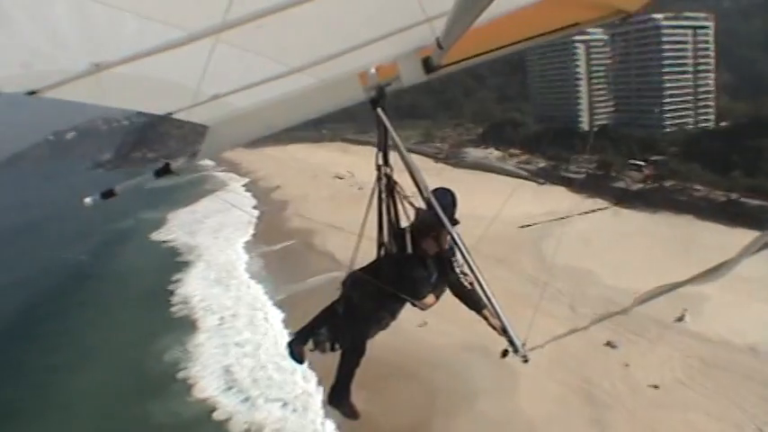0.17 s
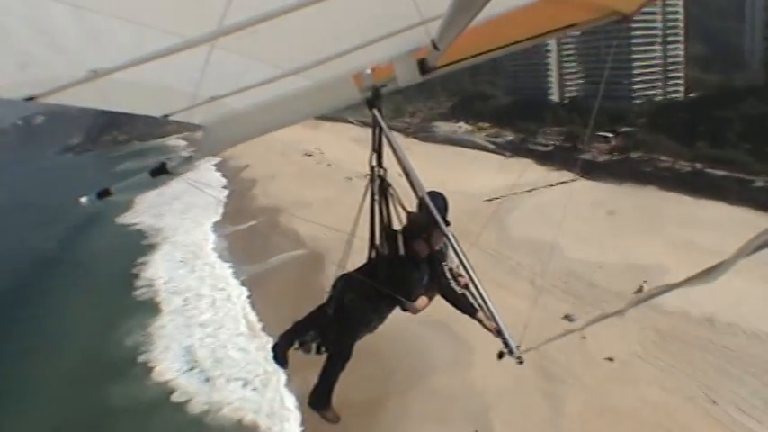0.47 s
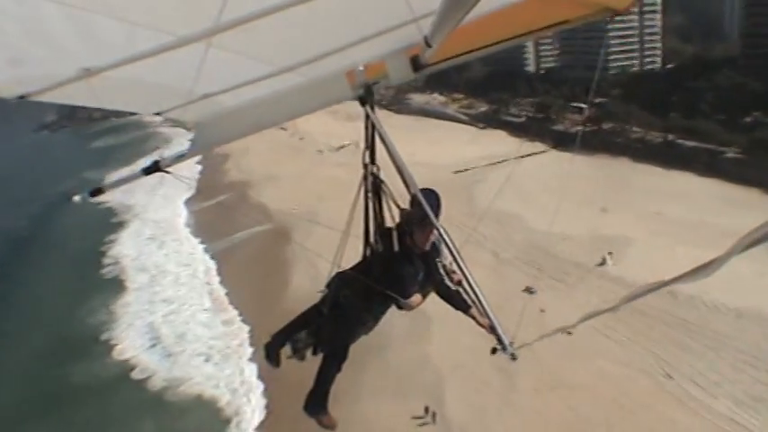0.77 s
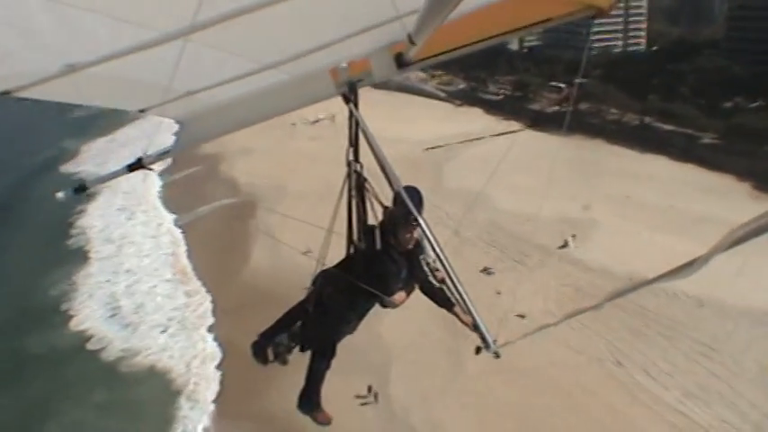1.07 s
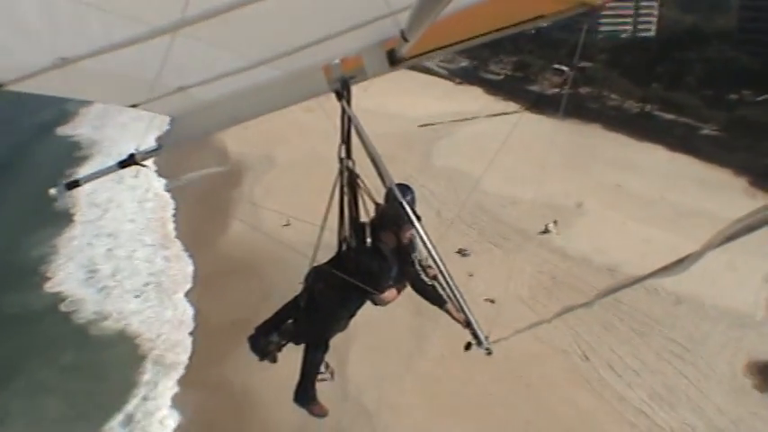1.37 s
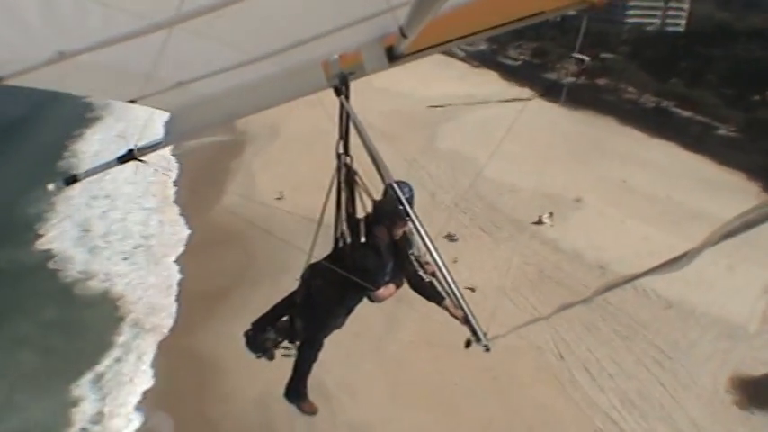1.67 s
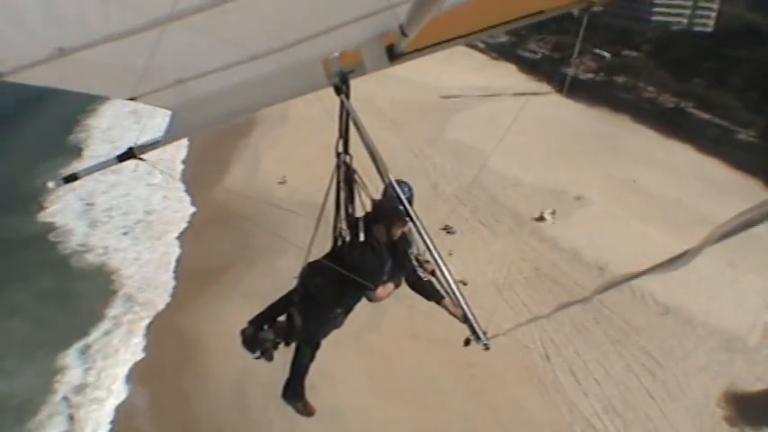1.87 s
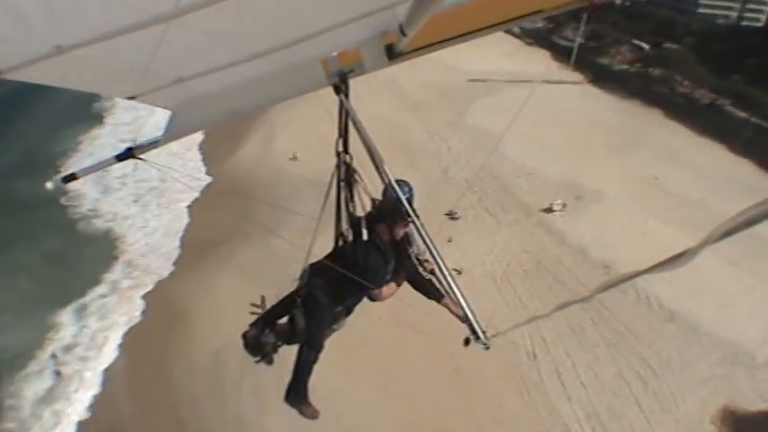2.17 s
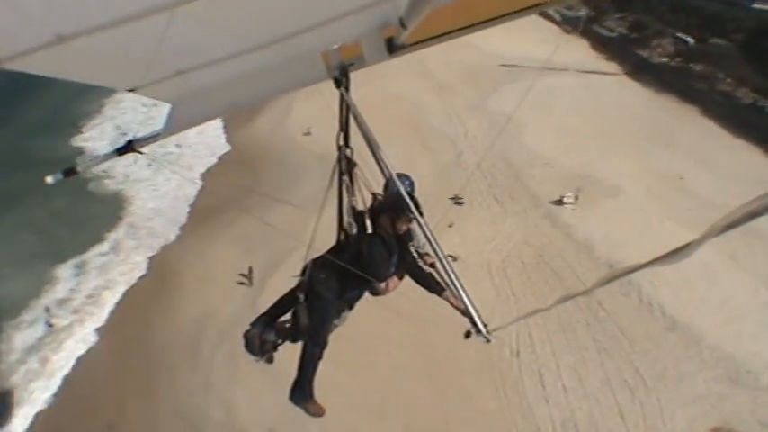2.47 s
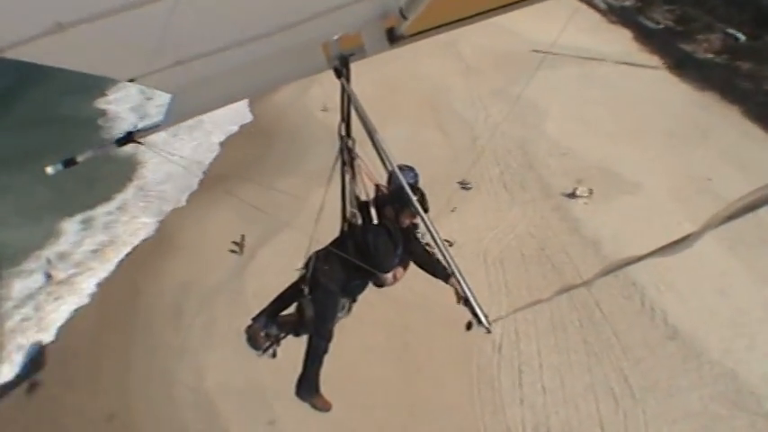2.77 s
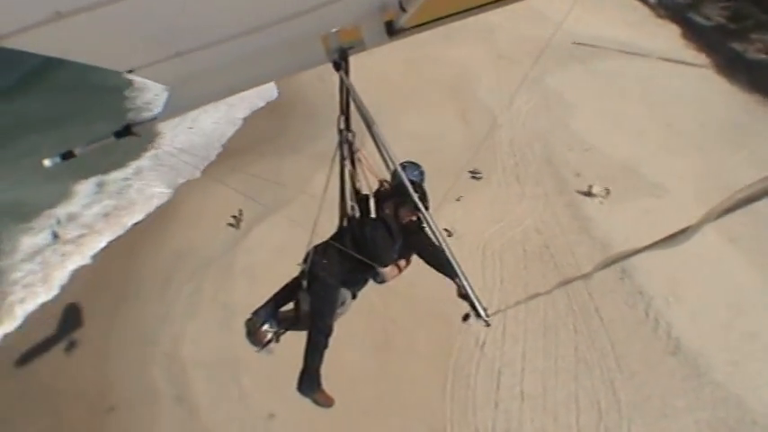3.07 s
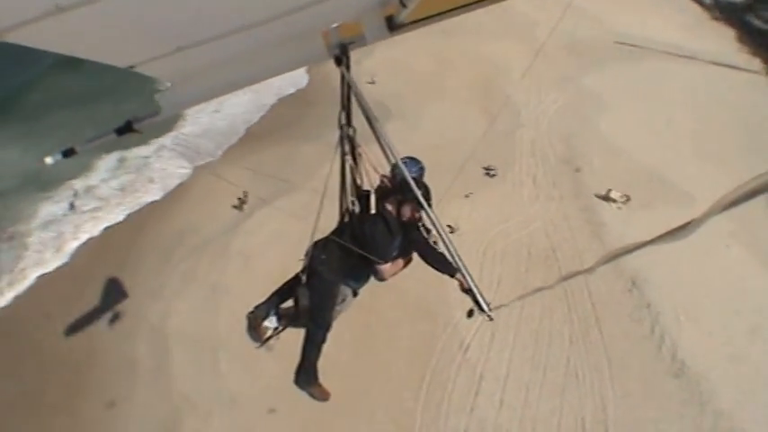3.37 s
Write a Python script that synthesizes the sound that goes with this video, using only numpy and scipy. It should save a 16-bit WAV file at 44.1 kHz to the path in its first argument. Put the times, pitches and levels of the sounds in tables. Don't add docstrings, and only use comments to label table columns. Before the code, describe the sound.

Wind rushes over an exposed, close stereo microphone on a hang glider, starting abruptly after about 0.04 seconds of silence. Deep rumble and ragged mid-range flutter continue throughout, with a faint wavering low moan. Dull slaps cluster around 0.6-1.0 and 1.6-2.0 seconds, with a strong gust near 1.94. Crisp snaps and hiss strengthen after 1.3, brightest around 3.3, continuing until 3.5. Outdoors, no echo.

```python
import sys
import numpy as np
from scipy import signal
from scipy.fft import rfft, irfft
from scipy.io import wavfile
from scipy.ndimage import uniform_filter1d, minimum_filter1d

SR = 44100
rng = np.random.default_rng(int(sys.argv[2]) if len(sys.argv) > 2 else 0)


def voltage_ratio(decibels):
    exponent = np.asarray(decibels, float) / 20
    return 10 ** exponent


def transcribe(u):
    v = np.clip(np.atleast_2d(u).T, -1, 1)
    q = np.round(v * 32767).astype(np.int16)
    wavfile.write(sys.argv[1], SR, q)


N = 155232
TIME = np.arange(N) / SR
CREST_DB = 2.5


def evened(x):
    return x / np.sqrt(np.mean(x ** 2) + 1e-20)


def curve(table, column=1):
    rows = np.array(table)
    return np.interp(TIME, rows[:, 0], rows[:, column])


def colour(x, spectrum):
    f, db = np.transpose(spectrum)
    hz = np.fft.rfftfreq(N, 1 / SR)
    gain = voltage_ratio(np.interp(np.log(hz + 1), np.log(f + 1), db))
    return evened(irfft(rfft(x) * gain, N))


def wander(top_hz):
    lowpass = signal.butter(2, top_hz, fs=SR, output="sos")
    return evened(signal.sosfiltfilt(lowpass, rng.standard_normal(N)))


def panned(db, pan_db):
    return voltage_ratio(db + np.array([[1], [-1]]) * pan_db * 0.5)


# time in seconds, level in dB.
SPEED = [(0.05, -44.5), (0.12, -42.5), (0.17, -50.5), (0.64, -48), (0.71, -51.5), (0.89, -51), (0.97, -45),
         (1.14, -44.5), (1.45, -43), (1.7, -40.5), (2.1, -40.5), (2.3, -38.5), (2.6, -36.5), (2.9, -35.5),
         (3.15, -35), (3.29, -33.5), (3.5, -35)]


def airspeed_db():
    speed = curve(SPEED)
    return speed - speed.mean()


# time in seconds, level in dB.
GUST = [(0.05, -22.5), (0.21, -22), (0.44, -21.5), (0.61, -21.5), (0.66, -18), (0.69, -22.5), (0.77, -17),
        (0.78, -25), (0.79, -21), (1.01, -18), (1.04, -19.5), (1.11, -18), (1.91, -17.5), (1.94, -8),
        (1.95, -21), (1.97, -17.5), (3.35, -19.5), (3.5, -21)]


def gusts_db():
    gust = curve(GUST)
    return gust - gust.mean()


def bursts():
    per_s, spread_db, rise_s, fall_s = 240, 4, 0.00066, 0.00077
    shared, slap_stir = 0.63, 7
    arrivals = rng.random((3, N)) < per_s / SR
    hits = arrivals * voltage_ratio(2 * spread_db * np.minimum(rng.exponential(1, (3, N)), 4))
    for s, db, _ in SLAPS:
        hits[2, round(s * SR)] += slap_stir * 10 * voltage_ratio(db)
    t = np.arange(1500) / SR
    shape = np.exp(-t / fall_s) - np.exp(-t / rise_s)
    power = signal.oaconvolve(hits, shape[None], axes=1)[:, :N]
    power = abs(shared * power[2] + (1 - shared) * power[:2])
    return power / power.mean()


# frequency in Hz, level in dB per Hz.
BUFFET = [(10, -41), (25, -17.5), (76, -6), (120, -1.5), (260, -1.5), (530, -9.5), (1000, -19.5),
          (2000, -38.5), (3300, -85)]


def buffet(flow, swell, burst):
    air = rng.standard_normal(N) * (2.3 + burst.mean(0)) ** 0.31
    return voltage_ratio(-14) * colour(air * voltage_ratio(1.31 * flow + 0.85 * swell), BUFFET)


# time in seconds, pitch in Hz, level in dB.
MOAN = [(0.06, 100, -26), (0.25, 122, -23), (0.5, 122, -23), (0.65, 130, -36), (0.92, 134, -24),
        (1.1, 132, -21), (1.25, 143, -19), (1.42, 146, -20), (1.56, 158, -30), (1.68, 170, -19),
        (1.98, 152, -18), (2.45, 152, -17.5), (2.62, 150, -21), (2.75, 140, -28), (2.94, 144, -18),
        (3.05, 150, -26), (3.5, 145, -28)]


def moan():
    width_hz, steady, wobble_hz = 18, 0.72, 9
    pitch = curve(MOAN) + wobble_hz * wander(15.8)
    turn = np.exp(2j * np.pi * np.cumsum(pitch) / SR)
    r = np.exp(-np.pi * width_hz / SR)
    fuzz = rng.standard_normal(N) / turn
    for _ in range(2):
        fuzz = signal.lfilter([1 - r], [1, -r], fuzz)
    mix = steady * evened(turn.real) + (1 - steady) * evened((turn * fuzz).real)
    return voltage_ratio(curve(MOAN, 2)) * evened(mix)


def kicked(air):
    kicks_per_s, share = 700, 0.4
    kicks = (rng.random(air.shape) < kicks_per_s / SR) * rng.laplace(size=air.shape)
    return np.sqrt(1 - share) * air + np.sqrt(share) * evened(kicks)


# frequency in Hz, level in dB per Hz.
EDDY = [(50, -38), (160, -8.5), (430, 1.5), (900, 0), (1500, -5.5), (2100, -16.5), (3200, -34),
        (16000, -86)]


def eddies(flow, speed, swell, burst, fitful):
    air = kicked(rng.standard_normal((2, N))) * (0.31 + burst) ** (0.5 * fitful)
    return voltage_ratio(-21) * colour(air * voltage_ratio(0.5 * flow + 0.55 * speed + 1.2 * swell), EDDY)


# frequency in Hz, level in dB per Hz.
FIZZ = [(1100, -20), (1800, -0.5), (2630, -2), (4950, -10), (7000, -23), (9500, -42), (13000, -50),
        (15700, -61)]


def fizz(flow, speed, swell, burst, fitful, crest):
    air = colour(rng.standard_normal((2, N)), FIZZ) * (0.47 + burst) ** (0.41 * fitful)
    return voltage_ratio(-33) * evened(air * voltage_ratio(0.58 * flow + 0.42 * speed + CREST_DB * crest + 0.37 * swell))


# frequency in Hz, level in dB per Hz.
HISS = [(2500, 0), (5000, -9), (7000, 2.5), (9300, 0.5), (11000, -6.5), (13000, -17), (16000, -36)]


def hiss(flow, speed, burst):
    air = colour(rng.standard_normal(N), HISS) * (0.5 + burst.mean(0)) ** 0.19
    return air * voltage_ratio(-51.5 + 0.18 * speed + 0.1 * flow)


# frequency in Hz, level in dB per Hz.
JET = [(2500, -16), (4000, 1.5), (5500, 3), (7500, -4), (9500, -10.5), (12000, -18.5), (15700, -30)]


def jet(speed, burst, crest):
    air = colour(rng.standard_normal((2, N)), JET) * (0.23 + burst) ** 0.25
    return air * voltage_ratio(-50.5 + 1.5 * speed + 2.24 * CREST_DB * crest)


# frequency in Hz, level in dB per Hz.
SHEEN = [(6000, -22), (10000, -11), (12000, 0), (16000, -12)]


def sheen(speed, crest):
    air = colour(rng.standard_normal((2, N)), SHEEN)
    return air * voltage_ratio(-66.5 + 0.3 * speed + 0.5 * CREST_DB * crest)


# time in seconds, peak in dB, left over right in dB.
SLAPS = [(0.068, -13, 2.5), (0.223, -12, -2.0), (0.313, -12, 1.0), (0.351, -14, -1.0), (0.506, -12, -1.0),
         (0.604, -12, -2.0), (0.649, -9, 0.5), (0.702, -11, 1.0), (0.733, -14, -3.0), (0.753, -7, 0.0),
         (0.764, -8, -1.0), (0.79, -13, 0.5), (0.823, -15, -1.5), (0.874, -11, -1.5), (0.88, -21, -2.0),
         (0.912, -13, 0.0), (0.943, -10, -3.0), (0.969, -10, 1.0), (1.052, -13, -1.0), (1.086, -12, 0.0),
         (1.311, -9, 1.5), (1.386, -7, 1.0), (1.63, -9, -1.0), (1.643, -6, 1.0), (1.764, -4, 2.5),
         (1.802, -7, 0.0), (1.871, -7, 2.0), (1.939, -7, 2.0), (1.97, -11, 1.0), (2.066, -10, -0.5),
         (2.275, -10, -1.0), (2.414, -9, -0.5), (2.572, -9, -1.0), (2.679, -7, -1.0), (3.014, -12, 0.5)]


def slaps():
    slap_s, trim_db = 0.0003, 2.5
    out = np.zeros((2, N))
    for s, db, pan_db in SLAPS:
        u = np.clip((TIME - s - 0.0012) / slap_s, 0, 40)
        out += panned(db + trim_db, pan_db) * u ** 3 * (1 - u / 4) * np.exp(-u) * 1.97
    return out


# time in seconds, peak in dB, left over right in dB.
SNAPS = [(0.1197, -32, 5.0), (0.3128, -39, 0), (0.4689, -38, -1.5), (0.7827, -36, 1.5), (0.8416, -30, -1.5),
         (0.875, -33, -1.5), (0.9922, -34, -4), (1.0281, -32, -6), (1.09, -37, 4), (1.1284, -29, -7),
         (1.1638, -31, 0.0), (1.1838, -35, 2.5), (1.2037, -32, -0.5), (1.2571, -32, 0.5), (1.2865, -33, -1),
         (1.307, -33, -1), (1.3404, -29, 0), (1.418, -25, 1.0), (1.4766, -32, 0.0), (1.538, -26, 6.0),
         (1.5644, -26, 1.5), (1.657, -22, -1), (1.7046, -35, -3), (1.7315, -33, -3), (1.753, -41, -1),
         (1.8029, -35, -2), (1.8343, -30, 6), (1.8707, -34, 0.5), (1.8932, -34, 0.0), (1.911, -27, -3),
         (1.961, -36, 2.0), (1.9775, -31, 2), (2.0658, -44, -1), (2.1137, -36, 0), (2.1401, -27, 2.5),
         (2.167, -23, -0.5), (2.2459, -31, 1.5), (2.3302, -31, 3.5), (2.3646, -29, -4), (2.385, -39, 3.0),
         (2.4175, -35, 2.5), (2.4309, -24, -1), (2.619, -24, 0.0), (2.639, -29, 3.0), (2.6814, -31, 2.5),
         (2.784, -27, -2), (2.861, -27, 0.0), (2.91, -33, 0.5), (2.9453, -32, -2), (3.1044, -30, 5),
         (3.168, -26, -2), (3.2052, -24, 3.0), (3.3693, -33, 3.0)]
# frequency in Hz, level in dB.
SNAP = [(1000, -45), (4000, 7), (8000, 2), (12000, -15), (16000, -25)]


def snaps():
    snap_s, trim_db = 0.0007, -5
    level = np.zeros((2, N))
    for s, db, pan_db in SNAPS:
        u = np.clip((TIME - s) / snap_s, 0, 40)
        level += panned(db + trim_db, pan_db) * np.e * u * np.exp(-u)
    return level * colour(rng.standard_normal((2, N)), SNAP)


# time in seconds, length in seconds, depth in dB.
LULLS = [
    (0.776, 0.007, -1),
    (.897, 0.013, -14),
    (1.02, 0.011, -8),
    (1.785, 0.0057, -14),
    (2.76, 0.021, -8.5),
]


def hush():
    length_s, depth_db = 0.007, -12
    dips = LULLS + [(s - length_s * 0.5, length_s, depth_db) for s, _, _ in SLAPS]
    return voltage_ratio(sum(db * np.exp(-((TIME - s) / length * 2) ** 2) for s, length, db in dips))


def scene():
    flow, speed, burst = gusts_db(), airspeed_db(), bursts()
    fitful = np.clip(1 - 0.05 * speed, 0, 2)
    swell = wander(7.6) * fitful
    low = buffet(flow, swell, burst) + moan()
    eddy = eddies(flow, speed, swell, burst, fitful)
    crest = np.clip(evened(low + eddy), -2.5, 2.5)
    high = fizz(flow, speed, swell, burst, fitful, crest) + hiss(flow, speed, burst)
    high = high + jet(speed, burst, crest) + sheen(speed, crest)
    high = high * voltage_ratio([[0], [-2]])
    calm = hush()
    return low * calm ** 0.58 + eddy * calm + high * calm ** 0.27 + slaps() + snaps()


def squeeze(dry):
    strength, span, makeup_db = 0.38, round(0.006 * SR), -0.28
    power = (dry ** 2).mean(0)
    lumps = uniform_filter1d(uniform_filter1d(power, span), span) / power.mean()
    even = dry * (1 + lumps) ** -strength
    return even * voltage_ratio(makeup_db) * np.sqrt(power.mean() / (even ** 2).mean())


def limit(x):
    ceiling, span = 0.83, round(0.003 * SR)
    room = np.minimum(ceiling / (abs(x).max(0) + 1e-9), 1)
    lowest = minimum_filter1d(room, 2 * span + 1)
    return x * uniform_filter1d(uniform_filter1d(lowest, span), span)


def band_limit(x):
    return signal.sosfilt(signal.butter(12, 15720, fs=SR, output="sos"), x)


def record(dry):
    opened = np.clip((TIME - 0.038) / 0.0021, 0, 1)
    mix = limit(squeeze(dry)) * opened
    return band_limit(mix)


dry = scene()
out = record(dry)
transcribe(out)
```